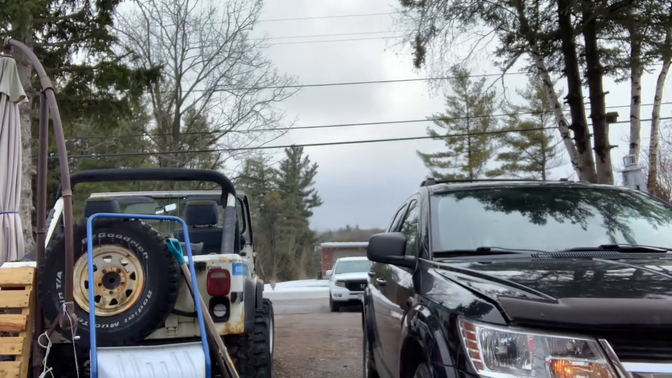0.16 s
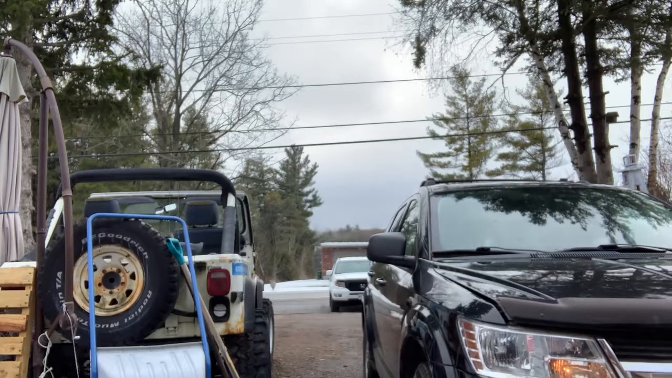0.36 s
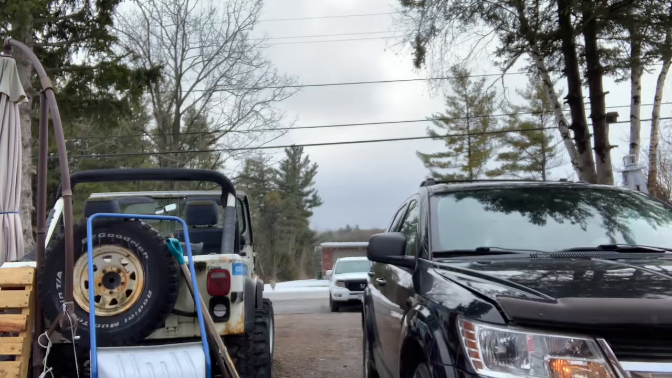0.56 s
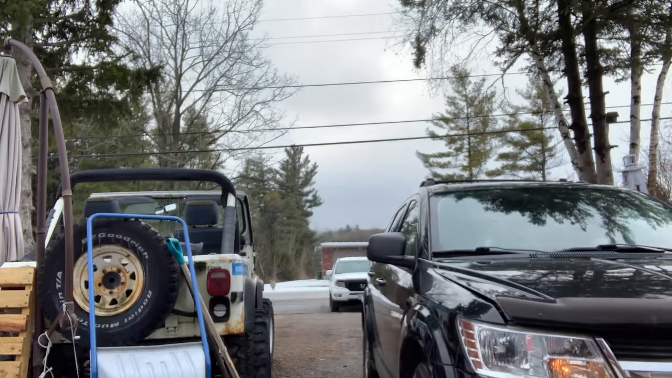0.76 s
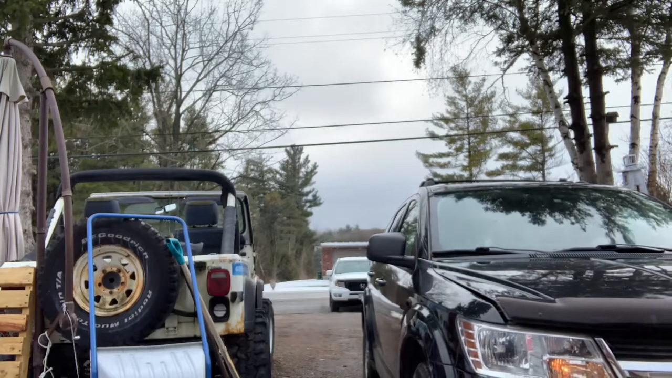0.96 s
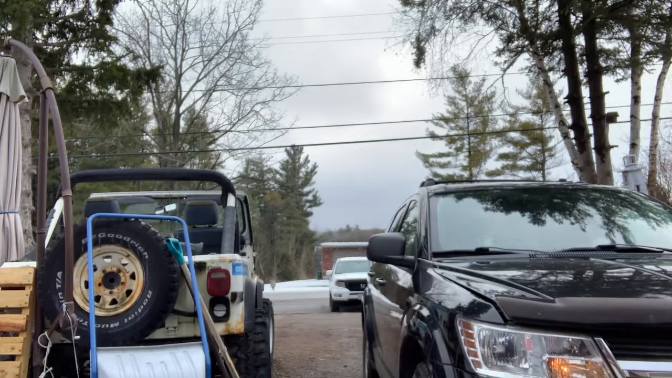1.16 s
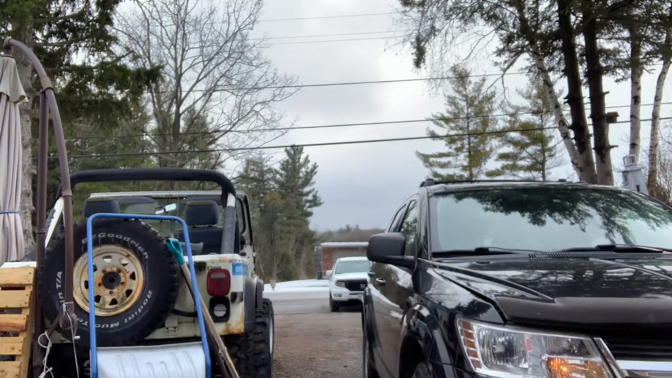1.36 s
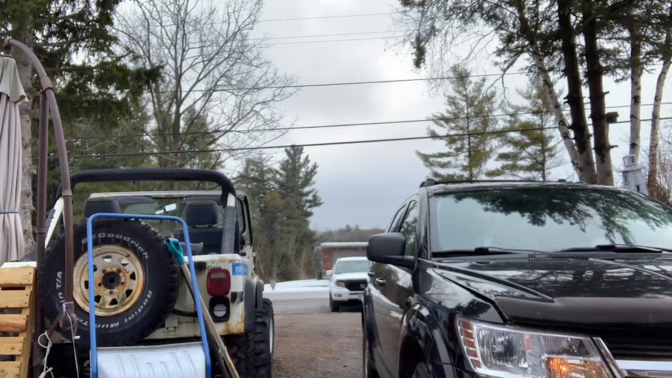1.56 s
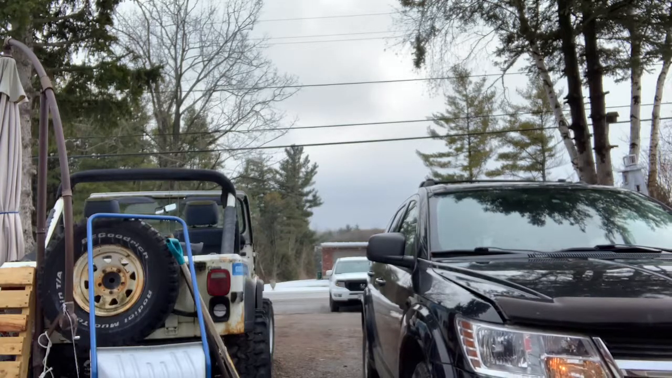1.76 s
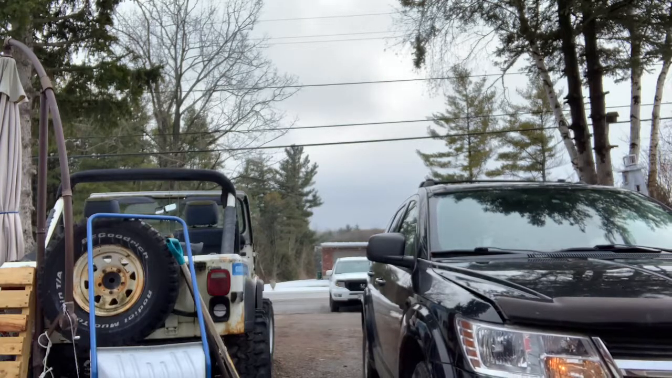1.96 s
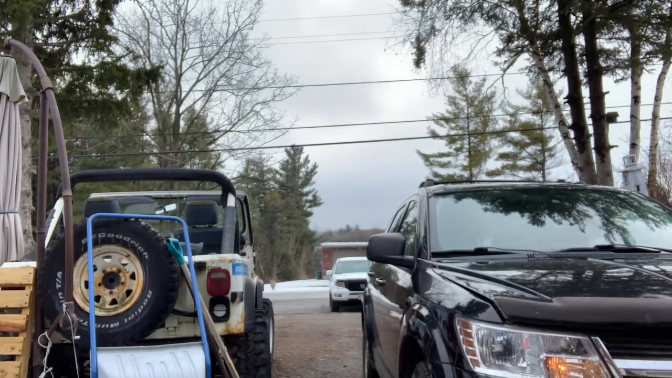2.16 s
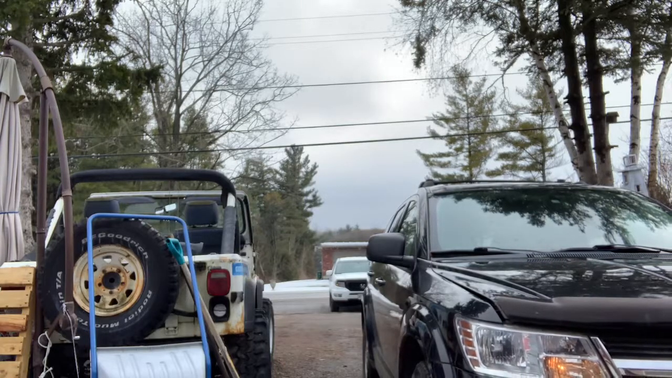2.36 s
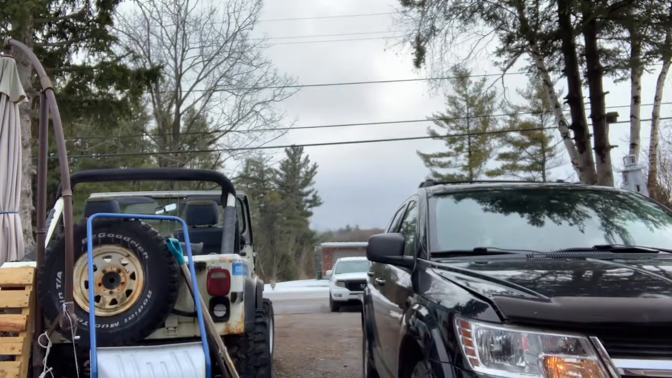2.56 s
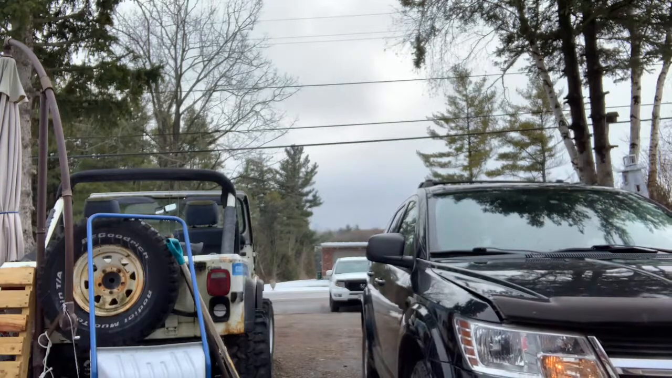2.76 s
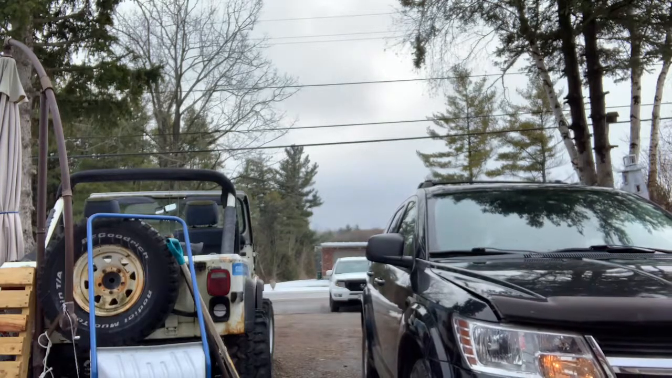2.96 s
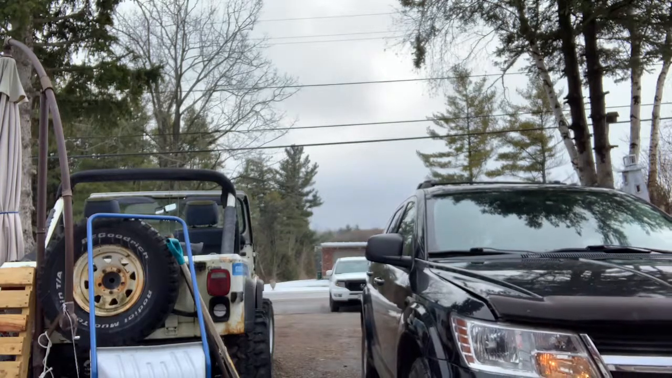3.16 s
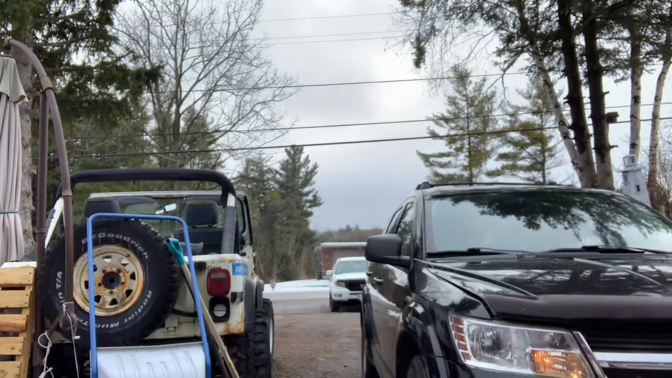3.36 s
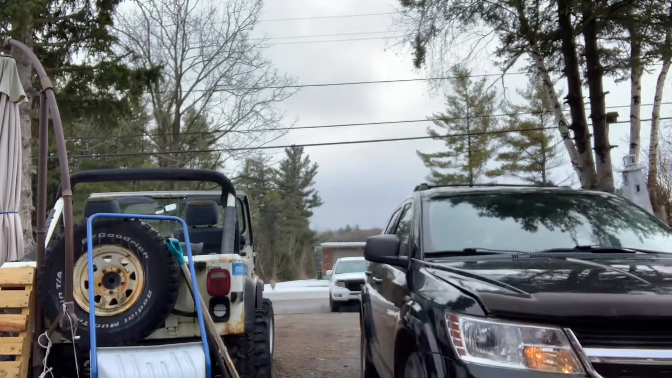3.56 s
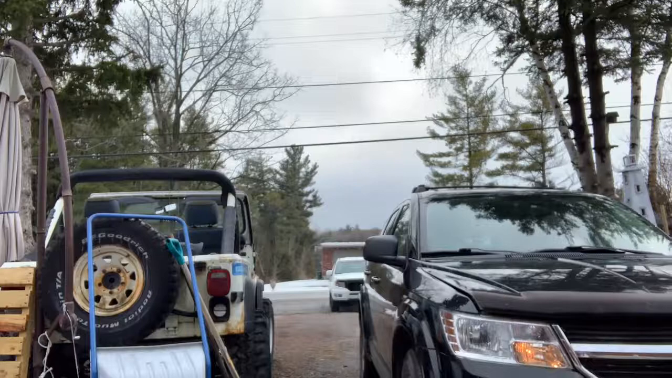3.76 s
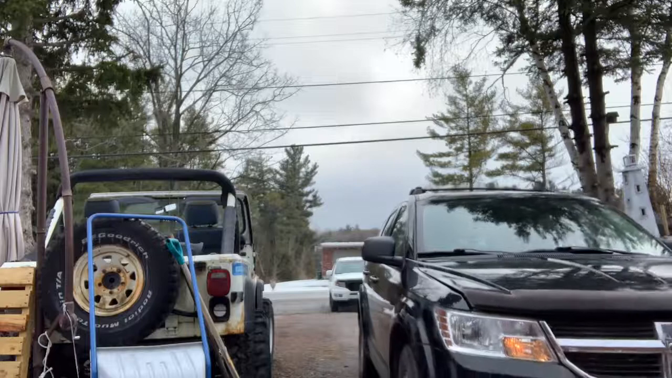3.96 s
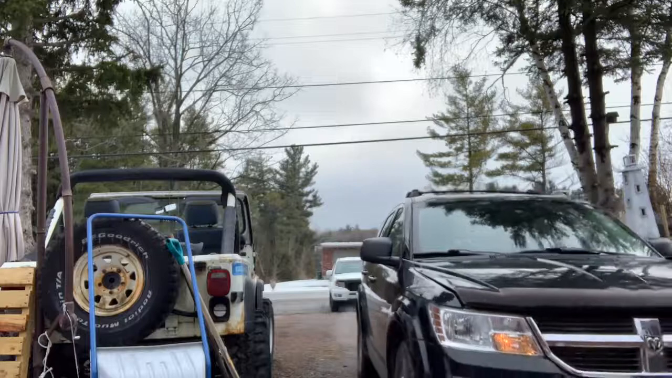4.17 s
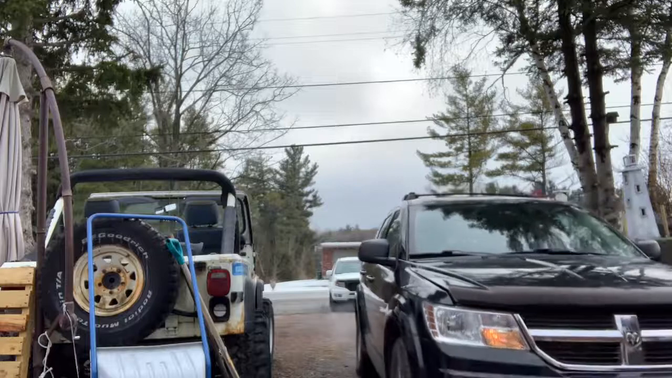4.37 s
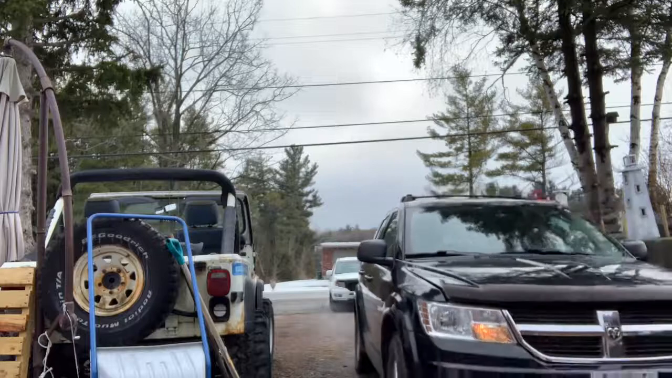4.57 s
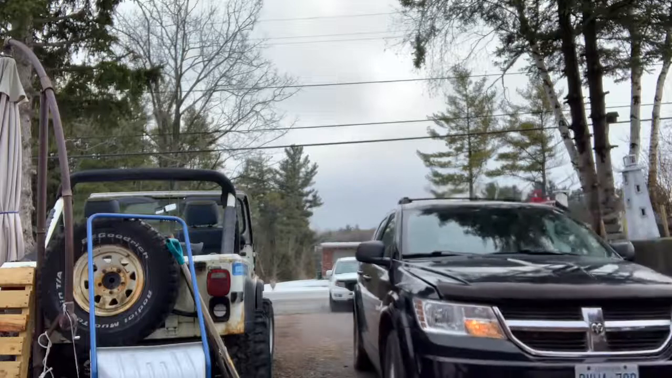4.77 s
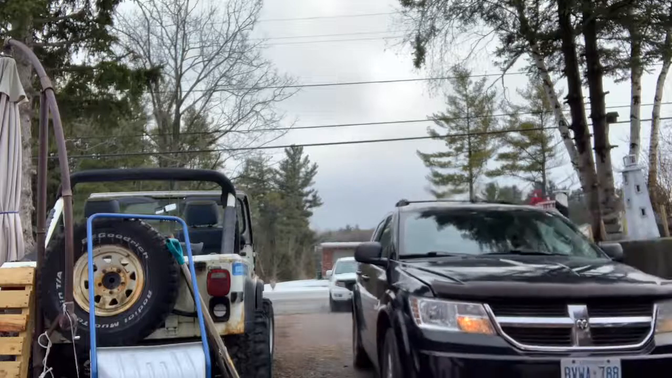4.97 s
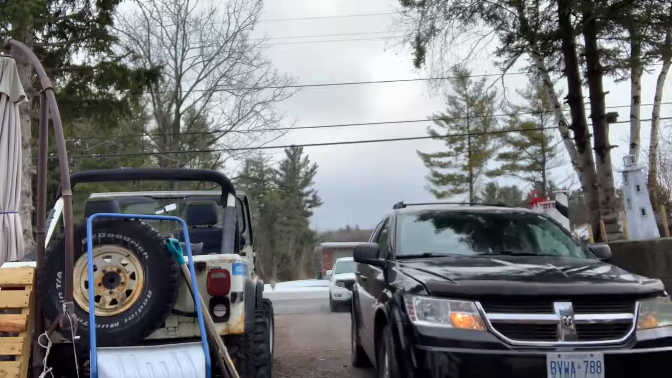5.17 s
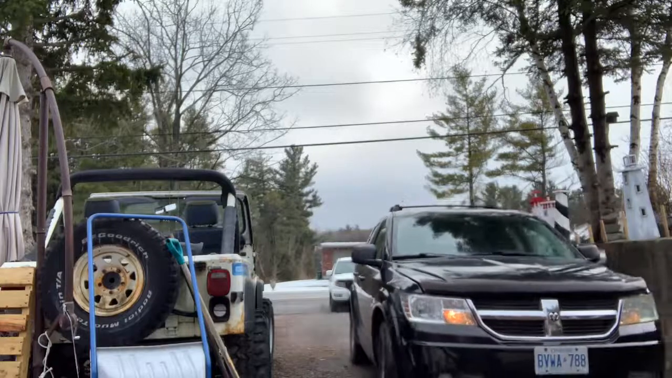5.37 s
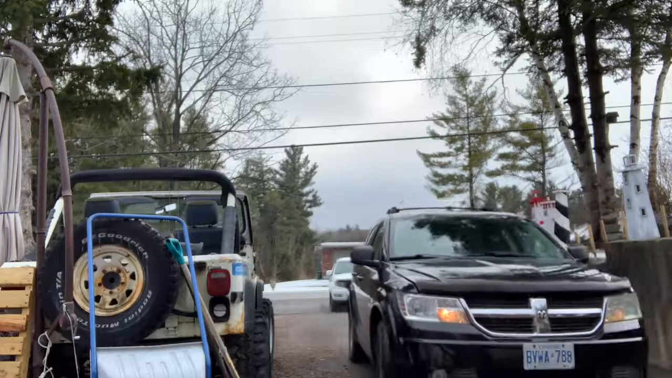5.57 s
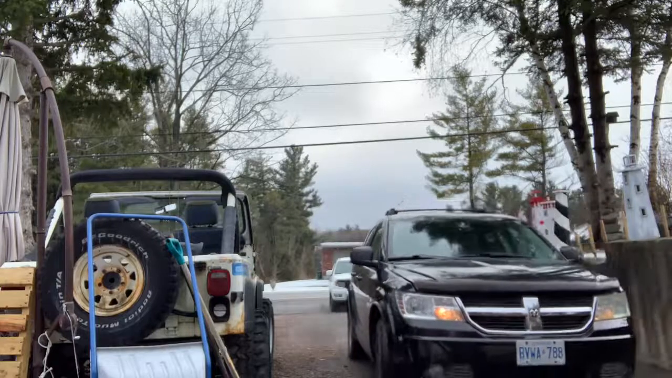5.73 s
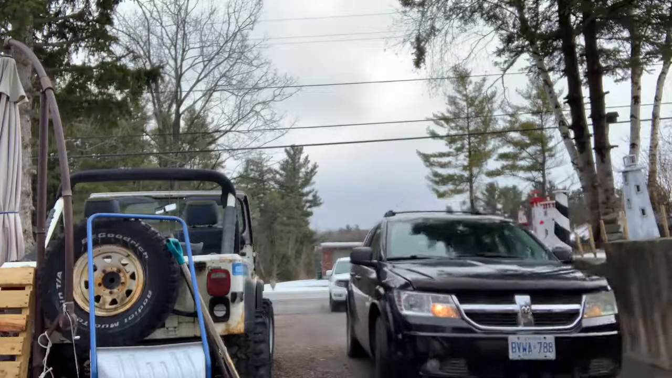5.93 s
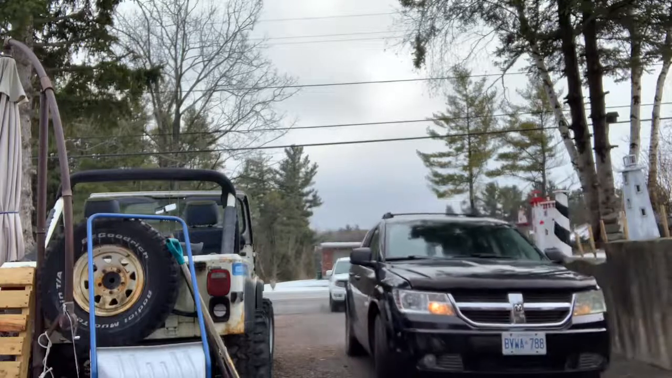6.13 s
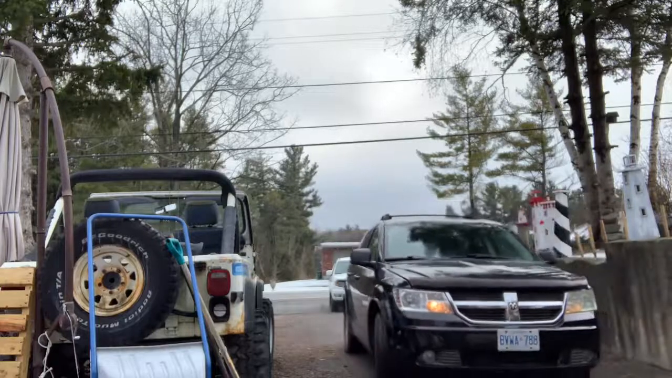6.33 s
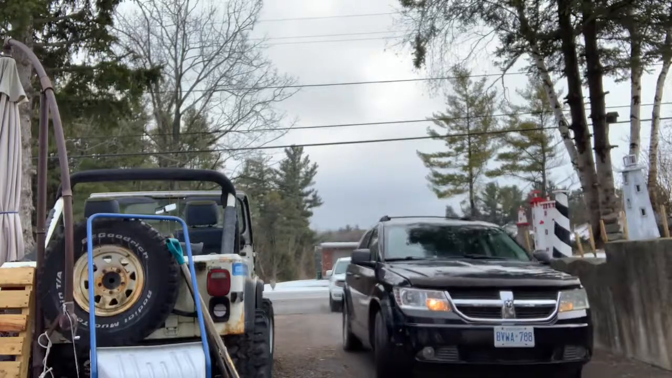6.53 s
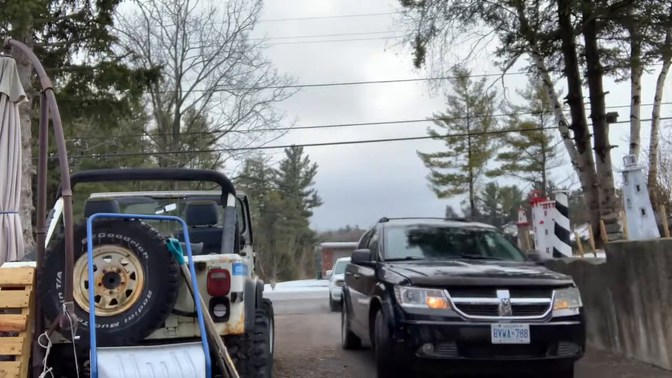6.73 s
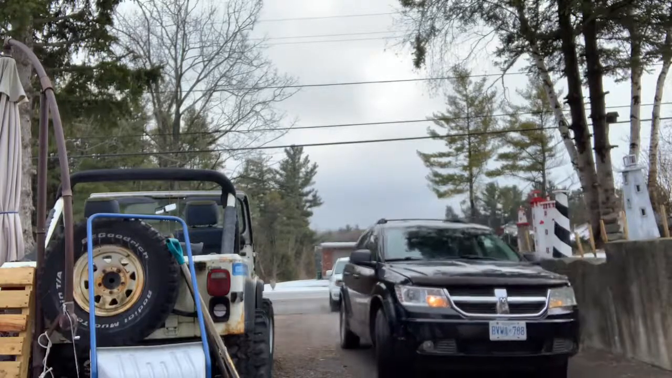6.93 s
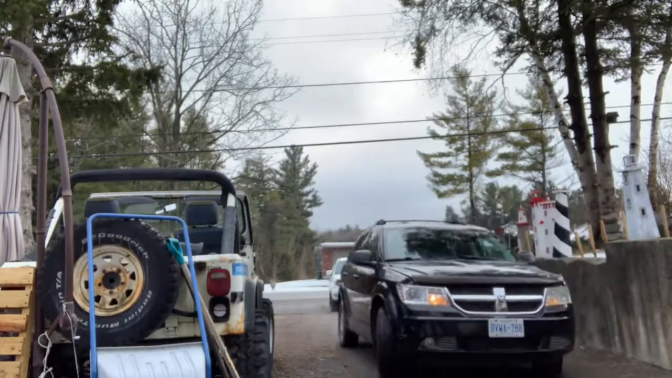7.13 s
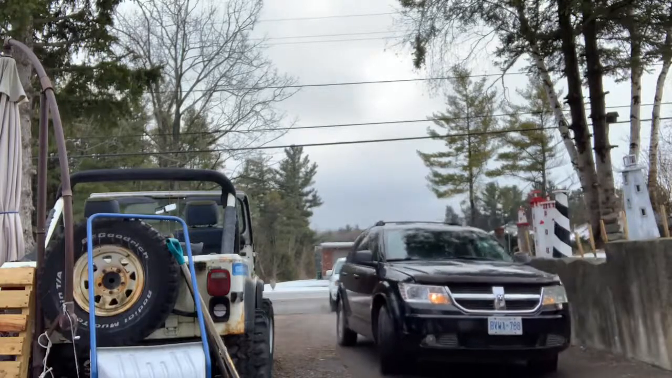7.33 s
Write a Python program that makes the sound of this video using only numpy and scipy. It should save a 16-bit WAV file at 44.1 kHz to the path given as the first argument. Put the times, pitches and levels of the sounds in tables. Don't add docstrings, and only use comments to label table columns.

```python
import sys
import numpy as np
from scipy import signal
from scipy.fft import rfft, irfft, next_fast_len
from scipy.io import wavfile
from scipy.ndimage import uniform_filter1d, map_coordinates

SR = 44100
rng = np.random.default_rng(int(sys.argv[2]) if len(sys.argv) > 2 else 0)


def generate_wav(sig):
    pcm = np.round(np.clip(np.atleast_2d(sig).T, -1, 1) * 32767).astype(np.int16)
    wavfile.write(sys.argv[1], SR, pcm)


def invert_db(level):
    return 10 ** (np.asarray(level, dtype=float) / 20)


N = 326340

# (time [s], shaft speed [turns/s], effort heard from the bay [dB],
# throttle heard from the pipe [dB])
ENGINE = [(0, 20.3, 0.5, -2.5), (.6, 20.4, -.5, -5), (1.1, 21.6, 0.5, 1), (2.0, 22.15, 0, -5.5),
          (2.3, 24, 1.5, 1), (2.72, 28.6, 4, 7), (3.09, 34.5, 6, 7), (3.4, 39.44, 6.5, 12.5),
          (3.65, 41.4, 6.5, 11), (3.85, 39.3, 6.5, 9), (4.08, 33.23, 4.5, 3.5), (4.4, 25.6, 3, -0.5),
          (4.85, 28.4, 3, 6.5), (5.05, 27.3, 3, -0.5), (5.3, 24.2, 2, -12), (6.2, 20.6, -1, -7),
          (6.88, 22.07, -1.1, -11.5), (7.4, 22, -2.5, -5)]
# (time [s], share of the way [0-1])
DISTANCE = [
    (0, 0.05),
    (3.6, 0.06),
    (4.4, 0.55),
    (5.4, 0.93),
    (7.4, 1),
]

# (multiple of shaft speed, level [dB])
STRONG_NOTES = [(2, 2.5), (3, 1.5), (4, -0.5), (5, -.5), (6, -2.5)]
# (pitch [Hz], width [Hz], level [dB])
MUFFLER = [(46.6, 19, -5.5), (68.1, 15.6, 4.5), (120.6, 17, -1), (135.7, 11.7, 1), (168.7, 19, 2),
           (230.6, 19, -7)]
# (pitch [Hz], width [Hz], share taken out [0-1])
ECHO_GAPS = [(84, 10, 0.57), (103, 18, .7), (145.7, 11.6, .8), (198, 9, 0.6)]
# (multiple of shaft speed, level [dB])
OTHER_NOTES = [(1, 4.5), (7, -3.5), (8, -5), (9, -3.5), (10, -13.5)]
# (pitch [Hz], level [dB])
PIPE = [(21, -63), (28, -56), (34, -43), (42, -53), (100, -55.5), (112, -56), (135, -52), (150, -56.5),
        (168, -47.5), (180, -50.5), (200, -64.5), (235, -57), (270, -57), (320, -69)]
# (time [s], length [s], level [dB])
CHUGS = [
    (0.005, .06, -40),
    (.4, .05, -44),
    (.56, .06, -43),
    (1.58, .05, -41),
    (2.0, .07, -38),
    (2.31, .07, -39.5),
]
# (pitch [Hz], level [dB])
RUMBLE = [(30, -32), (46, -8), (60, -2.5), (85, -4.5), (130, -6.5), (180, -9), (230, -31), (300, -34)]

# (pitch [Hz], level [dB])
IDLE = [(190, -4.5), (270, -14.5), (390, -11), (500, -7), (570, 4), (650, -8), (900, -10), (1250, -9),
        (1480, -11.5), (1900, -6), (2150, -12.5), (3100, -16.5), (4200, -15.5), (16000, -33.5)]
# (pitch [Hz], level [dB])
LOADED = [(190, -1), (290, -13), (450, -5), (590, 2), (800, -8), (1200, -4.5), (1450, -7.5), (1780, -5),
          (2100, -7.5), (2650, -8.5), (3200, -13), (4200, -12.5), (8000, -20), (16000, -28.5)]
# (pitch [Hz], level [dB])
FAR = [(190, -3.5), (290, -15.5), (460, 2), (800, -9.5), (1150, -6), (1450, -12.5), (1600, -4.5),
       (1850, -14.5), (2000, -11), (2250, -12), (4500, -21.5), (7000, -28), (10500, -27), (16000, -43)]
# (pitch [Hz], width [Hz], level [dB])
IDLE_PANELS = [(383, 12, -2.5), (470, 31, -1), (543, 22, -1), (1250, 47, -10), (1984, 65, -9.5),
               (2544, 220, -15)]
# (pitch [Hz], width [Hz], level [dB])
LOADED_PANELS = [(486, 44, 11.5), (593, 44, -1.5), (1270, 48, -19), (1780, 46, 10), (2440, 170, -15)]
# (pitch [Hz], width [Hz], level [dB])
FRONT_PANELS = [(464, 48, -15.5), (1008, 130, -12), (1580, 80, -10), (2014, 37, -8)]

# (time [s], peak level [dB], pitch [Hz], of which the ring sounds at 0.8 times, # grit
# decay [s], grit level [dB])
STONES = [
    (2.825, -38, 1813, .016, -1),
    (3.354, -33, 750, 0.012, -10),
    (4.35, -39, 1079, .013, -2),
    (4.446, -41, 1590, .012, -3),
    (5.013, -40, 1540, 0.016, 0),
    (5.4818, -25.5, 1600, 0.02, -14),
    (6.304, -36, 994, .03, -8),
    (6.82, -38, 1180, .015, -7),
    (7.334, -41, 1010, .015, -8),
]
# (time [s], length [s], level [dB])
CRUNCH = (5.157, 0.027, -33.5)
# (pitch [Hz], width [Hz], level [dB])
CRUNCH_RINGS = [(600, 150, -11), (810, 100, -.5), (1070, 130, 1), (1500, 340, -6), (2200, 700, -9)]

# (pitch [Hz], left minus right [dB])
LEAN = [(60, -3.5), (220, -3.5), (400, -9), (550, -6.5), (1100, -4), (1900, -2), (3000, -3.5), (4500, 0.2),
        (16000, 0)]
# (pitch [Hz], likeness [0-1])
ALIKE = [(60, 0.95), (200, .97), (300, 0.93), (450, .65), (700, 0.5), (1200, .45), (3000, 0.3),
         (5500, 0.28), (7000, 0.5), (9000, 0.8), (11000, 0.3), (16000, 0.33)]
# (pitch [Hz], phase [radians])
BEND = [(100, 0), (250, 0.97), (550, 1.3), (1200, 0.45), (2500, 0.22), (4000, 0.85), (5500, -0.6),
        (6500, -2.46), (7700, -4), (10000, -5.5), (11200, -9), (12500, -11), (14000, -12), (16000, -13)]

HISS_DB, RUMBLE_DB = -41, -46.5
RUMBLE_GROWS, RUMBLE_AWAY_DB = 0.62, -1.5
TONES_DB = -46
DRONE_DB, DRONE_FROM_S, DRONE_RISE_S = -43.5, 5.5, 0.21
SWING_DB, SWING_LOADED_DB, SWING_DRONE_DB = 3.5, 1, -0.5
CHUG_HZ = 66.7
CHUG_GAP_S, CHUG_GAP_DB = (5.89, 5.3, 7.11), -15
PIPE_SPREAD = .6
PHASE_WANDER = .15
WHINE_HZ, WHINE_DB, WHINE_SWING_DB = 373.3, -56, 3
SLIPS_HZ, SLIP_SCATTER_DB, SLIP_GRIT = 267, 2.5, .07
LEFT_LAG_S = 7.1 / SR
LOW_CUT_HZ = 20


def unit(x):
    return x / np.sqrt(np.mean(x ** 2) + 1e-20)


def along(points, hz):
    f, v = np.transpose(points)
    return np.interp(np.log(hz + 1), np.log(f + 1), v)


def curves(rows):
    s, *columns = np.transpose(rows)
    return [np.interp(np.arange(N) / SR, s, column) for column in columns]


def wobble(rate):
    coarse = np.arange(0, N + 64, 64)
    knots = rng.standard_normal(int(N * rate / SR) + 4)
    return np.interp(np.arange(N), coarse, map_coordinates(knots, [coarse * rate / SR]))


def filtered(x, response):
    m = next_fast_len(N + 8192)
    return irfft(rfft(x, m) * response(np.fft.rfftfreq(m, 1 / SR)), m)[..., :N]


def resonances(modes, f):
    total = 0
    for k, (centre, width, db) in enumerate(modes):
        ring = 1j * f * width / (centre * centre - f * f + 1j * f * width)
        total = total + (-1) ** k * invert_db(db) * ring
    return total


def rush(spectrum, patchy_db, panels=(), hum_db=-9, swell_db=1.1):
    hz = np.fft.rfftfreq(2048, 1 / SR)
    shape = (2, len(hz), N // 1024 + 3)
    noise = rng.standard_normal(shape) + 1j * rng.standard_normal(shape)
    patches = uniform_filter1d(rng.standard_normal(shape[1:]), size=40, axis=0)
    patches = unit(uniform_filter1d(patches, size=4, axis=1))
    colour = unit(invert_db(along(spectrum, hz)) * (hz > spectrum[0][0]))
    colour = colour[:, None] * invert_db(patchy_db * patches)
    if panels:
        drift = uniform_filter1d(rng.standard_normal((len(panels), shape[2])), size=3)
        swells = invert_db(swell_db * unit(drift))
        peaks = np.array([np.abs(resonances([p], hz)) ** 2 * invert_db(-p[2]) for p in panels])
        colour = np.hypot(colour, invert_db(hum_db) * unit(peaks.T @ swells))
    return unit(signal.istft(noise * colour, window="cosine", nperseg=2048)[1][:, :N])


def chamber_gain(grid):
    power = sum(np.abs(resonances([(c, w, db / 2)], grid)) ** 4 for c, w, db in MUFFLER)
    gain = np.sqrt(power)
    for centre, width, share in ECHO_GAPS:
        gain = gain * (1 - share * np.abs(resonances([(centre, width, 0)], grid)) ** 2)
    return gain


def note_gains(shaft_hz, throttle_db):
    t = np.arange(N) / SR
    load = np.clip((shaft_hz - 22) / 8, 0, 1)
    grid = np.arange(1., 400)
    chambers = chamber_gain(grid)
    swing_db = SWING_DB + (SWING_LOADED_DB - SWING_DB) * load
    gains = {}
    for k, db in STRONG_NOTES:
        level_db = TONES_DB + throttle_db + db + swing_db * wobble(12)
        if k == 3:
            level_db = level_db - 4.5 * (1 - load)
        gains[k] = np.interp(k * shaft_hz, grid, chambers) * invert_db(level_db)
    drone_rise = (1 + np.tanh((t - DRONE_FROM_S) / DRONE_RISE_S)) / 2
    drone = invert_db(DRONE_DB + SWING_DRONE_DB * wobble(6)) * drone_rise
    gap_db = sum(CHUG_GAP_DB * np.exp(-((t - s) / .035) ** 2) for s in CHUG_GAP_S)
    gains[3] = np.hypot(gains[3], drone) * invert_db(gap_db)
    for k, db in OTHER_NOTES:
        gains[k] = invert_db(along(PIPE, k * shaft_hz) + db + 1.4 * load + 2.4 * wobble(5))
    return gains


def exhaust():
    shaft_hz, effort_db, throttle_db = curves(ENGINE)
    away, t = curves(DISTANCE)[0], np.arange(N) / SR
    angle = 2 * np.pi * np.cumsum(shaft_hz) / SR
    boom = np.zeros(N)
    for k, gain in note_gains(shaft_hz, throttle_db).items():
        phase = k * angle + PHASE_WANDER * wobble(3.7) - PIPE_SPREAD * k ** 2
        boom += np.sqrt(2) * gain * invert_db(-1.67) * np.sin(phase)
    chugs = sum(invert_db(db) * np.exp(-((t - s) / length) ** 2) for s, length, db in CHUGS)
    boom += np.sqrt(2) * chugs * np.sin(2 * np.pi * CHUG_HZ * t + .5 * wobble(3.86))
    boom = np.array([boom, np.roll(boom, shift=150)])
    rumble_db = RUMBLE_DB + RUMBLE_GROWS * effort_db + RUMBLE_AWAY_DB * away
    return boom + invert_db(rumble_db) * rush(RUMBLE, patchy_db=0.5)


def bay_hiss():
    shaft_hz, effort_db, _ = curves(ENGINE)
    away = curves(DISTANCE)[0]
    load = np.clip((shaft_hz - 22.5) / 9, 0, 1)
    idle = rush(IDLE, patchy_db=1.5, panels=IDLE_PANELS, hum_db=-6.0)
    loaded = rush(LOADED, patchy_db=0.7, panels=LOADED_PANELS, hum_db=-11.5)
    far = rush(FAR, patchy_db=1.07, panels=FRONT_PANELS, hum_db=-9.5)
    near = np.sqrt(1 - load) * idle + np.sqrt(load) * loaded
    hiss = np.sqrt(1 - away) * near + np.sqrt(away) * far
    firing = 1 + 0.048 * np.sin(3 * 2 * np.pi * np.cumsum(shaft_hz) / SR)
    return invert_db(HISS_DB + effort_db + 0.3 * wobble(16)) * firing * hiss


def pump_whine():
    shaft_hz, away = curves(ENGINE)[0], curves(DISTANCE)[0]
    level = invert_db(WHINE_DB + WHINE_SWING_DB * wobble(4.9))
    level = level * np.clip(23.5 - shaft_hz, 0, 1) * (1 - away)
    whine = level * np.sin(2 * np.pi * np.cumsum(WHINE_HZ + 4 * wobble(2.7)) / SR)
    return whine * [[1], [-.6]]


def stones():
    out, t = np.zeros((2, N + SR)), np.arange(SR // 10) / SR
    dull = signal.butter(3, [450, 2000], "band", fs=SR)
    for s, db, hz, life, grit_db in STONES:
        swell = t / .0005 * np.exp(1 - t / .0005)
        pop = -np.sin(2 * np.pi * .8 * hz * t) * swell
        grit = unit(signal.lfilter(*dull, rng.standard_normal((2, len(t)))))
        grit = grit * 0.65 * np.exp(-t / life)
        place = out[:, round(s * SR):][:, :len(t)]
        place += invert_db(db + 4.0) * (pop * [[1], [-.6]] + invert_db(grit_db) * grit)
    return out[:, :N]


def crunch():
    s, length, db = CRUNCH
    t = np.arange(SR // 10) / SR
    clicks = np.diff(np.floor(t * SLIPS_HZ + .5), prepend=0)
    slips = clicks * invert_db(SLIP_SCATTER_DB * rng.standard_normal(len(t))) * [[1], [-.6]]
    grit = SLIP_GRIT * rng.standard_normal((2, len(t)))
    press = np.sqrt(np.abs(np.sin(np.pi * np.clip(t / length, 0, 1) ** .6)))
    crush = np.zeros((2, N))
    crush[:, round(s * SR):][:, :len(t)] = (slips + grit) * press
    crush = filtered(crush, lambda f: resonances(CRUNCH_RINGS, f))
    return invert_db(db) * crush / np.sqrt(np.sum(crush ** 2) / (2 * length * SR))


def ports(pair):
    m = next_fast_len(N + 2048)
    hz = np.fft.rfftfreq(m, 1 / SR)
    turn = np.arccos(np.clip(along(ALIKE, hz), 0, 1)) / 2
    direct, scattered = rfft(pair, m) * [np.cos(turn), np.sin(turn)]
    lag = np.pi * hz * LEFT_LAG_S + along(BEND, hz) / 2
    shade = invert_db(along(LEAN, hz) / 2) * np.exp(-1j * lag)
    left, right = (direct + scattered) * shade, (direct - scattered) / shade
    return irfft(np.array([left, right]), m)[:, :N]


def scene():
    sources = exhaust() + bay_hiss() + pump_whine() + stones() + crunch()
    return filtered(ports(sources), lambda hz: (1j * hz / (LOW_CUT_HZ + 1j * hz)) ** 2)


def band_limit(x):
    return signal.sosfilt(signal.butter(12, 15750, fs=SR, output="sos"), x)


def record(dry):
    return band_limit(dry)


dry = scene()
out = record(dry)
generate_wav(out)
```